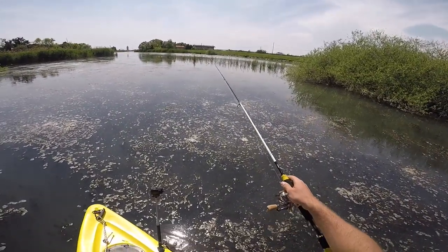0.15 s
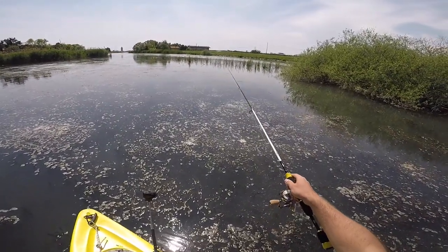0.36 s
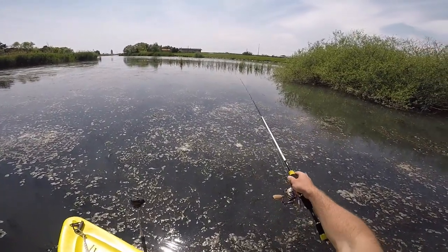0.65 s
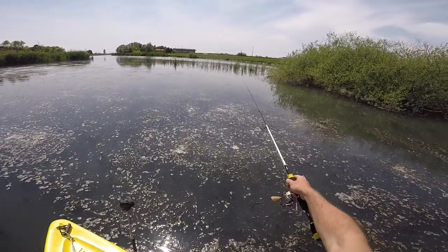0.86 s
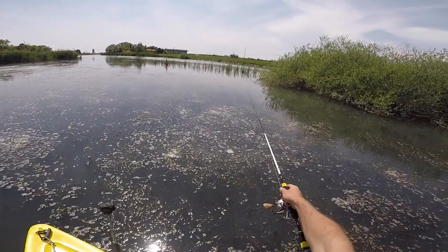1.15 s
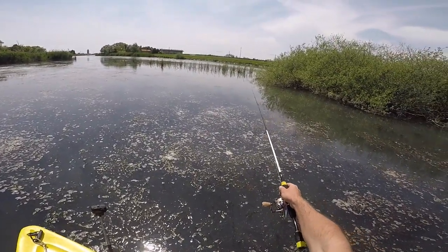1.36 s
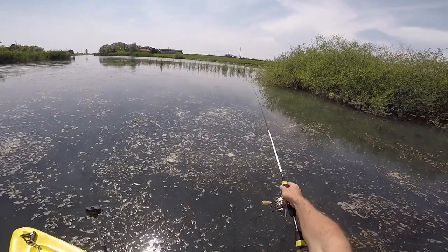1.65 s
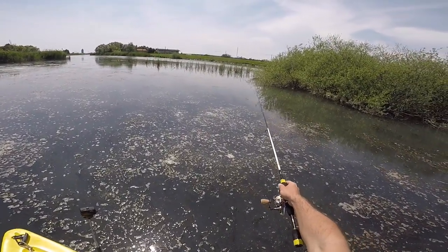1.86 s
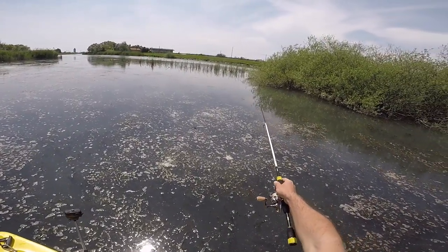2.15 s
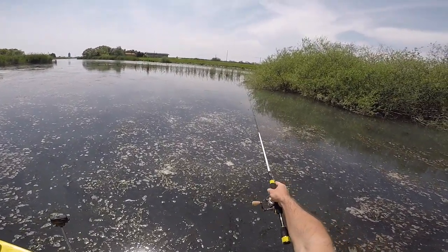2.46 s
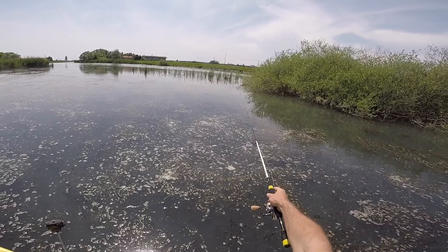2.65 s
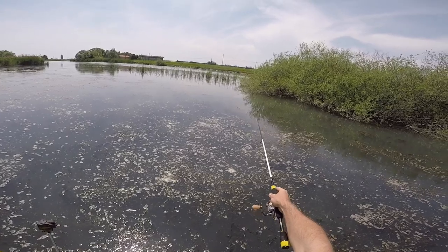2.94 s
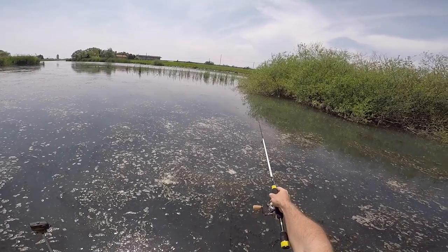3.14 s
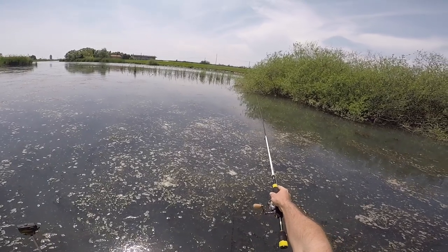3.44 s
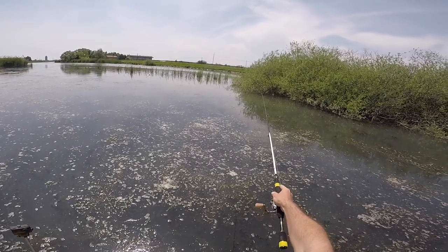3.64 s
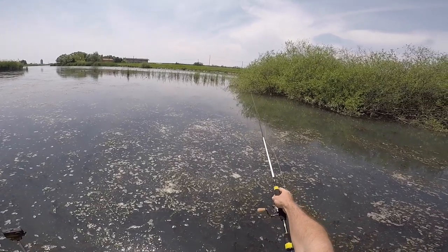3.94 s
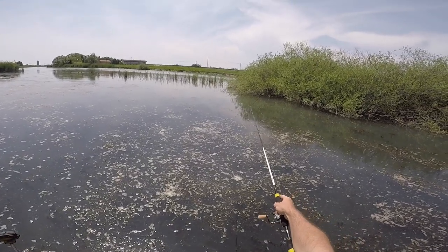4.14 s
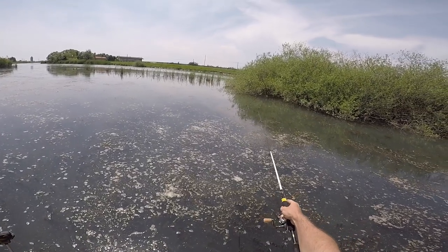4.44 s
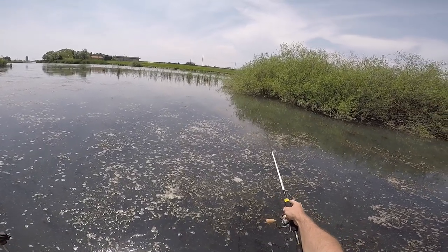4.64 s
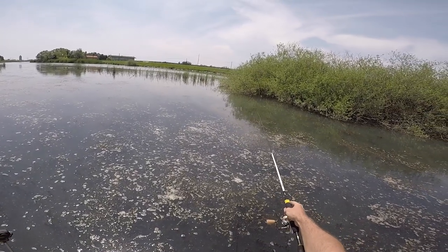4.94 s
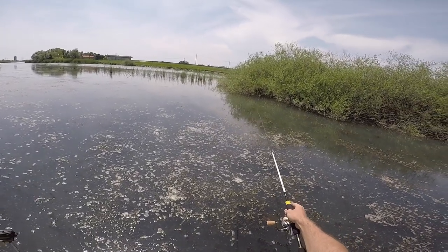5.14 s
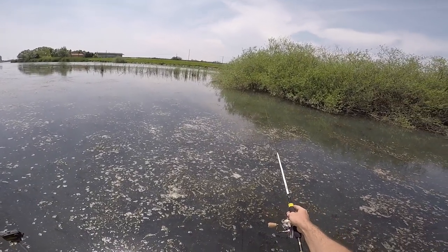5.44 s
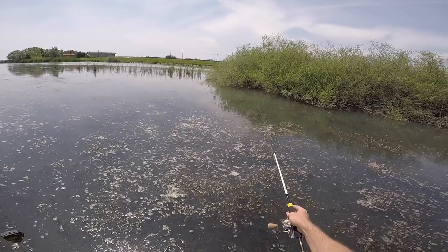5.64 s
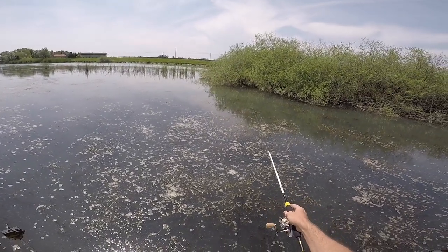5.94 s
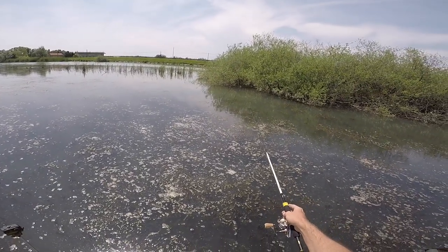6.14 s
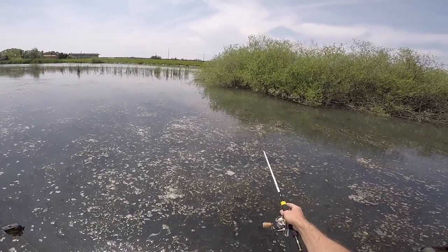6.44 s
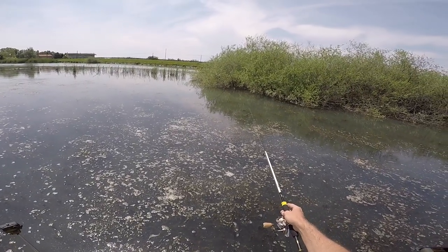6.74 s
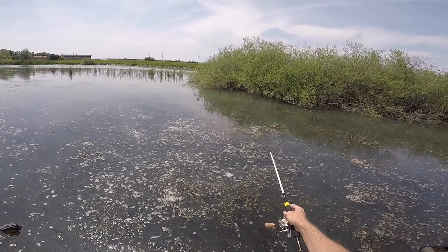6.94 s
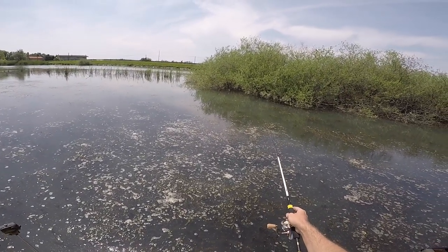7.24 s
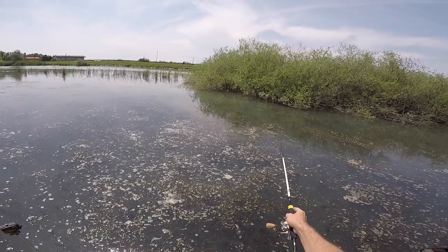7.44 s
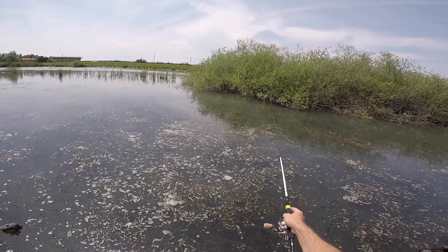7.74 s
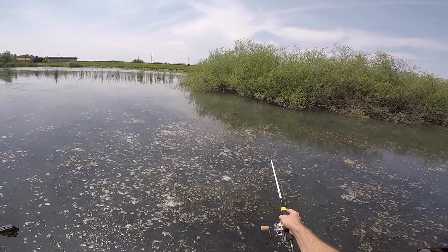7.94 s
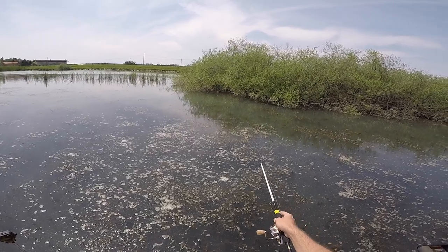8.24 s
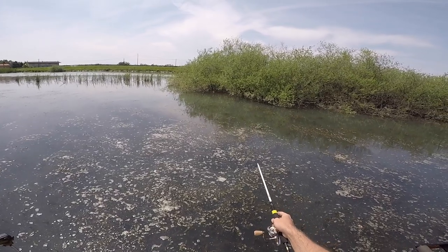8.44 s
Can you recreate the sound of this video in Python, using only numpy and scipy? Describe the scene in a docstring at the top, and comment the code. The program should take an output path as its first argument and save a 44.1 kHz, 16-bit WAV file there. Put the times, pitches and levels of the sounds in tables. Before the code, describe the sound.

Marsh birds whistle, twitter and trill over a distant road roar while fishing tackle ticks and squeaks close by and low wind rumbles on the microphone.

```python
"""An angler drifts on a marsh pond under a distant roar, a low drone, the rustle of reeds and far chatter.
Small birds whistle, twitter and buzz as swept sine tones; the tackle at the right ticks and squeaks throughout.
A far motor drones as one tone until about 2.4 s, just as wind starts to rumble as low noise on two microphone ports.
Dry trills of shaped noise, a peep and falling chips follow from 4.6 s, far tyres sing near 6 s at the left,
and arched chirps at the left end the scene while the wind, now head-on, sheds small eddies."""
import sys
import numpy as np
from scipy import signal
from scipy.io import wavfile
from scipy.ndimage import uniform_filter1d

SR = 44100
rng = np.random.default_rng(int(sys.argv[2]) if len(sys.argv) > 2 else 0)


def generate_wav(signal):
    """Clip the signal to [-1, 1] and save it as 16-bit WAV at the path in sys.argv[1]."""
    frames = np.transpose(np.atleast_2d(signal))
    scaled = np.clip(frames, -1, 1) * 32767
    pcm = np.round(scaled).astype(np.int16)
    wavfile.write(sys.argv[1], SR, pcm)


N = 378817
TIME = np.arange(N) / SR  # s
ALONG = np.linspace(0, 1, 64)  # progress through a note


def amp(db):
    """Decibel definition: 20 dB is a tenfold amplitude."""
    return 10 ** (np.asarray(db) / 20)


def unit(x):
    """Normalization: scales a signal to an rms of one."""
    return x / np.sqrt(np.mean(abs(x) ** 2) + 1e-24)


def follow(rows):
    """Linear interpolation: every column of a curve, at each sample."""
    s, *columns = np.transpose(rows)
    return [np.interp(TIME, s, column) for column in columns]


def shape(points, hz):
    """Spectral envelope: gain joined in dB on a log-frequency axis."""
    f, db = np.transpose(points)
    return amp(np.interp(np.log(hz + 1), np.log(f), db))


def place(x, pan_db):
    """Intensity panning: shares the power between the ports; a positive pan_db favours the left."""
    gains = np.array([amp(pan_db / 2), amp(-pan_db / 2)]).reshape(2, -1)
    return x * gains / np.sqrt(np.mean(gains ** 2, 0))


def add(mix, s, sound):
    """Superposition: adds a sound to the mix from s seconds on."""
    part = mix[:, max(round(s * SR), 0):][:, :sound.shape[-1]]
    part += sound[..., :part.shape[1]]


def drift(count, rate):
    """Slow random modulation: normal values, rate a second, joined by straight lines."""
    knots = rng.standard_normal(int(count / SR * rate) + 2)
    return np.interp(np.arange(count) / SR * rate, np.arange(len(knots)), knots)


def noise(points, same, lead_ms=0, patchy_db=0):
    """Partial coherence: coloured noise, alike at the ports by the share same, the left one leading."""
    hz = np.fft.rfftfreq(4096, 1 / SR)
    a, b, c, d, patches = rng.standard_normal((N // 1024 + 5, len(hz), 5)).T
    # level patches spread over neighbouring frequencies and moments
    patches = unit(uniform_filter1d(uniform_filter1d(patches, 40, 0), 5, 1))
    same = np.clip(same, 0, 1)
    left = a + 1j * b
    delay = np.exp(-2j * np.pi * hz * lead_ms / 10 ** 3)[:, None]
    right = same * left * delay + np.sqrt(1 - same ** 2) * (c + 1j * d)
    spectrum = np.array([left, right]) * shape(points, hz)[:, None] * amp(patchy_db * patches)
    return unit(signal.istft(spectrum, nperseg=4096, noverlap=3072)[1][:, :N])


def glide(hz, octaves, bow=0):
    """Logarithmic pitch: a slide centred on hz; bow makes it slide faster at first."""
    return hz * 2 ** (octaves * (ALONG - .5 - bow * (ALONG - .5) ** 2))


def whistle(length, pitches, overtone_db=-30, waver=0.015, flutter_db=2):
    """Near-pure tone: an unsteady pitch and its octave, a third of a cycle apart at the two ports."""
    u = np.linspace(0, 1, max(round(length * SR), 64))
    hz = np.interp(u, np.linspace(0, 1, len(pitches)), pitches) * (1 + waver * drift(len(u), 460))
    phase = 2 * np.pi * np.cumsum(hz) / SR + np.array([[0], [-2 * np.pi / 3]])
    swell = signal.windows.tukey(len(u), 1 / 4) * amp(flutter_db * drift(len(u), 185))
    return unit(swell * (np.sin(phase) + amp(overtone_db) * np.sin(2 * phase)))


def buzzy_note(length, pitch, octaves, sweep_hz, buzz_hz=185, rough=0.32):
    """Frequency modulation: a sliding note swept quickly up and down, its loudness pulsing at the same rate."""
    t = np.arange(round(length * SR)) / SR
    buzz = 2 * np.pi * buzz_hz * t
    sweep = sweep_hz * (np.sin(buzz) + rough * drift(len(t), 1684))
    hz = np.interp(t / length, ALONG, glide(pitch, octaves)) + sweep
    swell = signal.windows.tukey(len(t), .5) * (1 - 0.29 * np.cos(buzz))
    quarter_cycle = np.array([[0], [np.pi / 2]])  # between the ports
    return unit(swell * np.sin(2 * np.pi * np.cumsum(hz) / SR + quarter_cycle))


def banks(x, t60=0.31):
    """Diffuse reverberation: sparse scattered echoes after 4 ms, falling by 60 dB in t60 seconds."""
    t = np.arange(SR // 2) / SR
    sparse = rng.standard_normal((2, len(t))) * (rng.random((2, len(t))) < 2000 / SR)
    taps = sparse * amp(-60 * t / t60) * (t > .004)
    return signal.fftconvolve(x, taps / np.linalg.norm(taps, axis=1, keepdims=True), axes=1)[:, :N]


def skim(x, delay_s=.0055, echo=0.42):
    """Discrete reflection: a call arrives again off the water and the bank, its ports exchanged."""
    return x + echo * np.array([np.interp(TIME - delay_s, TIME, port) for port in x[::-1]])


# One bird's repeated falling chip. Each entry: start in seconds.
CHIP_STARTS = [4.999, 5.247, 5.563, 5.862, 6.216]
CHIP_S, CHIP_HZ, CHIP_OCTAVES, CHIP_SWEEP_HZ = 0.018, 6860, -0.245, 358
CHIP_DB, CHIP_FADE_DB_PER_S, CHIP_PAN_DB = -56.5, 5, 0  # level of the first chip, and its decline
FLICK_S, FLICK_HZ, FLICK_OCTAVES, FLICK_DB = .009, 5220, -.45, -7  # level relative to the chip


def chips():
    """Frequency modulation: falling buzzed chips, each weaker and ending in a soft downward flick."""
    out = np.zeros((2, N))
    for s in CHIP_STARTS:
        db = CHIP_DB - CHIP_FADE_DB_PER_S * (s - CHIP_STARTS[0])
        chip = buzzy_note(CHIP_S, CHIP_HZ, CHIP_OCTAVES, CHIP_SWEEP_HZ)
        add(out, s, amp(db) * place(chip, CHIP_PAN_DB))
        flick = whistle(FLICK_S, glide(FLICK_HZ, FLICK_OCTAVES))
        add(out, s + 0.98 * CHIP_S, amp(db + FLICK_DB) * place(flick, CHIP_PAN_DB))
    return out


# Buzzy calls. Each row: start in seconds, length in seconds, mid pitch in Hz, rise in octaves,
# level in dB, sweep in Hz, left over right in dB.
BUZZY_CALLS = [(1.415, 0.049, 6400, -.28, -59.5, 430, 8), (2.514, 0.032, 6100, -.12, -63.5, 330, 3),
               (3.205, 0.072, 5400, 0.24, -67, 330, 1), (3.747, 0.032, 7000, 0.3, -59.5, 700, 4),
               (4.14, .032, 4800, .42, -66, 220, -2), (4.195, 0.031, 5600, -1.2, -60, 150, 0),
               (4.29, 0.05, 3310, -0.081, -66.5, 480, 11)]


def buzzes():
    """Frequency modulation: single calls whose fast sweep is heard as a buzz."""
    out = np.zeros((2, N))
    for s, length, pitch, octaves, db, sweep_hz, pan_db in BUZZY_CALLS:
        add(out, s, amp(db) * place(buzzy_note(length, pitch, octaves, sweep_hz), pan_db))
    return out


# Dry trills. Each row: first syllable in seconds, end of the run in seconds, syllables per second,
# syllable length in seconds, mean level in dB before the cut in scene(), brightness from 0 to 1.
TRILL_RUNS = [(4.689, 4.93, 24, 0.038, -63, 0.1), (5.064, 5.21, 23.5, 0.013, -59, 1),
              (5.312, 6.43, 22.62, 0.014, -60, 0.93), (6.533, 6.56, 13, 0.032, -57.5, 1),
              (6.619, 7.11, 13, 0.039, -60, 0.8)]
# Spectra of the dull and the bright syllables. Each row: frequency in Hz, relative level in dB.
DULL_SPECTRUM = [(2500, -17), (3700, 7), (5100, -0.5), (6200, -20), (9000, -25)]
BRIGHT_SPECTRUM = [(3200, -6), (4600, -0.5), (5500, -5), (6400, 0.5), (7300, -4), (8500, -21)]


def warbler():
    """Amplitude-modulated noise: runs of short toneless syllables, from dull to bright."""
    dull, bright = np.zeros((2, 1, N))
    for first, last, rate, length, db, share in TRILL_RUNS:
        share = np.clip(share, 0, 1)
        for s in np.arange(first, last, 1 / rate):
            window = unit(signal.windows.tukey(round(length * SR), .8))
            syllable = amp(db + 1.8 * rng.standard_normal()) * window
            add(dull, s, np.sqrt(1 - share) * syllable)
            add(bright, s, np.sqrt(share) * syllable)
    return dull * noise(DULL_SPECTRUM, same=0.06) + bright * noise(BRIGHT_SPECTRUM, same=0.031)


# Arched chirps of one bird. Each row: start in seconds, length in seconds, top pitch in Hz, level in dB.
ARCHED_CHIRPS = [(0.562, 0.045, 4070, -69), (7.325, 0.022, 4480, -54.5), (7.569, 0.026, 4660, -58),
                 (7.825, 0.023, 4450, -57.5), (8.084, 0.038, 4540, -59.5), (8.396, 0.019, 4940, -55.5)]
ARCH_START_HZ, ARCH_END_HZ, ARCH_PAN_DB = 2710, 3180, 30


def arches(point=1.16, foot_db=-4):
    """Pitch arch: a tone that climbs and falls back, loudest at the top, at the left."""
    out = np.zeros((2, N))
    feet = ARCH_START_HZ + (ARCH_END_HZ - ARCH_START_HZ) * ALONG
    for s, length, top, db in ARCHED_CHIRPS:
        note = whistle(length, feet + (top - feet) * abs(np.sin(np.pi * ALONG)) ** point)
        swell = amp(foot_db * np.linspace(-1, 1, note.shape[1]) ** 2)
        add(out, s, amp(db) * place(unit(note * swell), ARCH_PAN_DB))
    return out


# Whistled slurs. Each row: start in seconds, length in seconds, pitch in Hz, rise in octaves,
# level in dB, left over right in dB.
WHISTLED_SLURS = [(.268, 0.033, 2930, -.12, -68, 8), (0.341, .065, 2770, 0.083, -65, 8),
                  (.582, 0.031, 6850, -.28, -64, 6), (1.098, 0.028, 2850, 0.42, -62, 12),
                  (2.868, 0.015, 3210, 0.37, -59, 15), (3.185, .016, 4230, 0.015, -64, 4),
                  (4.124, .012, 3450, -.45, -63, 4), (5.813, 0.04, 3700, -0.19, -66, 6),
                  (7.923, 0.036, 5630, -0.62, -65, -1)]
SLUR_ECHO_DB = -13  # these callers, like those of the buzzes and seeps, sit deeper in the bushes


def slurs(waver=0.0075, bow=0.54):
    """Portamento: plain tones that slide, with echoes from the bushes."""
    out = np.zeros((2, N))
    for s, length, hz, octaves, db, pan_db in WHISTLED_SLURS:
        note = whistle(length, glide(hz, octaves, bow), waver=waver)
        add(out, s, amp(db) * place(note, pan_db))
    return out + amp(SLUR_ECHO_DB) * banks(out)


# Thin dropping calls. Each row: start in seconds, length in seconds, top pitch in Hz, level in dB,
# left over right in dB, hold as a bare exponent (1 is an even slide, more is a later drop).
THIN_CALLS = [(1.949, 0.032, 7170, -54, 3, 5.8), (3.588, 0.047, 5330, -61.5, 0, 6.3)]
SEEP_DROP, SEEP_SCOOP = 0.48, 0.089  # shares of the pitch lost by the end and lacking at the start
SEEP_SCOOP_S = 0.0042  # time constant of the initial rise
SEEP_FADE_DB, SEEP_ECHO_DB, SEEP_T60 = -7, -9.5, .75  # loss by the end; echo level; ring of the bushes in s


def seeps():
    """Power-law glide: a thin tone holds a high pitch, then drops and fades, and the bushes ring."""
    out = np.zeros((2, N))
    for s, length, top, db, pan_db, hold in THIN_CALLS:
        scoop = SEEP_SCOOP * np.exp(-ALONG * length / SEEP_SCOOP_S)
        note = whistle(length, top * (1 - SEEP_DROP * ALONG ** hold - scoop), waver=0.0033)
        fade = amp(SEEP_FADE_DB * np.linspace(0, 1, note.shape[1]) ** (hold / 2))
        add(out, s, amp(db) * place(unit(note * fade), pan_db))
    return out + amp(SEEP_ECHO_DB) * banks(out, t60=SEEP_T60)


# A far bird's twitter. Each row: first syllable in seconds, end of the run in seconds,
# syllables per second, mean pitch in Hz, mean level in dB.
TWITTER_RUNS = [(0.663, .77, 26.5, 3290, -67.5), (0.829, 0.856, 31, 3460, -65),
                (1.214, 1.35, 23, 3430, -63), (3.027, 3.16, 25, 3460, -60.5)]


def twitterer(note_s=0.0135, fall_octaves=-0.088, grace_ratio=1.13, grace_db=-7, grace_lead_s=0.016,
              spread=0.011):
    """Rapid repetition: one syllable over and over, a soft high grace note before a falling note."""
    out = np.zeros((2, N))
    for first, last, rate, hz, db in TWITTER_RUNS:
        for s in np.arange(first, last, 1 / rate):
            hop, size = rng.standard_normal(2)
            pitches = glide(hz * (1 + spread * hop), fall_octaves)
            add(out, s - grace_lead_s, amp(db + size + grace_db) * whistle(note_s, grace_ratio * pitches))
            add(out, s, amp(db + size) * whistle(note_s, pitches))
    return place(out, 11)


# One round, dipping peep. Each row: time in seconds, pitch in Hz, level in dB.
PEEP_CURVE = [(4.571, 2890, -64), (4.582, 3220, -58), (4.591, 3040, -54), (4.601, 2940, -50.5),
              (4.613, 3100, -56), (4.626, 3150, -62)]
PEEP_PAN_DB, PEEP_ECHO_DB = 9, -6


def peep():
    """Pitch contour: one smooth note at the left, loudest where it dips, dying away in the reeds."""
    out = np.zeros((2, N))
    s, hz, db = np.transpose(PEEP_CURVE)
    length = s[-1] - s[0]
    note = whistle(length, np.interp(s[0] + ALONG * length, s, hz), waver=.006, flutter_db=-1.5)
    swell = amp(np.interp(s[0] + np.arange(note.shape[1]) / SR, s, db))
    add(out, s[0], place(note * swell, PEEP_PAN_DB))
    return out + amp(PEEP_ECHO_DB) * banks(out, t60=0.36)


# Ticks and creaks. Each row: start in seconds, length in seconds, level in dB, lift of the low modes in dB.
TICK_EVENTS = [(0.02, 0.0064, -52.5, -13), (0.141, 0.006, -53, 2), (0.955, 0.0019, -47.5, 8),
               (.966, 0.0025, -54, 0), (1.832, 0.0023, -51.5, -8), (2.169, 0.0042, -56, -9),
               (2.221, .007, -56.5, 4), (2.308, 0.0049, -49.5, -10), (2.442, 0.017, -55.5, -7),
               (2.511, 0.0027, -48.5, -6), (3.035, 0.0019, -51, -3), (3.249, .002, -55, -5),
               (4.038, 0.0017, -50.5, -4), (4.212, .012, -63, -4), (5.383, 0.0019, -55, -19),
               (6.410, 0.0024, -54.5, 6), (6.775, 0.003, -44.5, 9), (7.058, 0.0023, -56.5, -10),
               (7.1533, .009, -45, 9), (7.164, .003, -51, 0), (8.069, 0.001, -57, -15)]
# Modes of the reel. Each row: mean frequency in Hz, relative level in dB, 60 dB decay time in seconds.
REEL_MODES = [(1780, 4.5, 0.02), (2600, 4.5, 0.0058), (3660, 3.5, 0.0076), (4300, 4, 0.01),
              (5500, -8, 0.0044), (6300, 1, 0.0033), (7440, 0, 0.0099), (8150, -2, 0.005)]


def tackle(slips_per_s=1300, grit=0.55, crack_db=-4, crack_low_hz=1250, crack_high_hz=6800,
           dying_db=-9, first_slip=2.1, detune=0.03):
    """Stick-slip excitation of modes: a snap and a dying run of slips drive a dry crack and the reel."""
    out, t = np.zeros((2, N)), np.arange(1500) / SR
    band = signal.butter(6, [crack_low_hz, crack_high_hz], 'band', fs=SR, output='sos')
    crack = signal.sosfilt(band, signal.unit_impulse(len(t)))
    for s, length, db, body_db in TICK_EVENTS:
        count = round(length * SR)
        slips = (rng.random(count) < slips_per_s / SR) + grit / 2 * rng.standard_normal((2, count))
        slips[:, 0] += first_slip
        tuning = 1 + detune * rng.standard_normal(len(REEL_MODES))  # a little different each time
        ring = np.zeros(len(t))
        for k, (hz, level, t60) in enumerate(REEL_MODES):
            decay = amp(level + body_db * (hz < 4800) - 60 * t / t60)
            ring += (-1) ** k * decay * np.sin(2 * np.pi * hz * tuning[k] * t)
        response = unit(ring) + amp(crack_db) * unit(crack)
        dying_slips = slips * amp(dying_db * np.linspace(0, 1, count))
        tick = signal.fftconvolve(dying_slips, response[None], axes=1)
        add(out, s, amp(db) * tick * np.sqrt(count / np.sum(tick ** 2, 1, keepdims=True)))
    return place(out, -10.5)


# Rubbing squeaks. Each row: start in seconds, length in seconds, pitch in Hz, rise in octaves,
# level in dB, overtone relative to the fundamental in dB.
RUB_SQUEAKS = [(1.975, 0.027, 1660, -0.067, -55.5, -12), (2.056, 0.017, 3620, 0.14, -57, -6),
               (2.432, 0.022, 1758, 0.22, -52, -11), (6.459, 0.013, 1755, 0.22, -53, -7),
               (6.501, 0.017, 1800, -0.29, -55.5, -4), (6.809, 0.049, 3150, 0.2, -55.5, -12),
               (7.159, 0.027, 3020, 0.27, -52.5, -5), (7.498, 0.033, 2965, 0.25, -52, -9)]
SQUEAK_PAN_DB = -5.5


def squeaks(bow=0.91, grow_db=5):
    """Friction tone: rubbing parts of the reel sing, growing louder as the pitch levels off."""
    out = np.zeros((2, N))
    for s, length, hz, octaves, db, overtone_db in RUB_SQUEAKS:
        note = whistle(length, glide(hz, octaves, bow), overtone_db, waver=0.006)
        add(out, s, amp(db) * unit(note * amp(grow_db * np.linspace(0, 1, note.shape[1]))))
    return place(out, SQUEAK_PAN_DB)


# Strength of the wind on the ports. Each row: time in seconds, reference level in dB.
WIND_STRENGTH = [(0, -57), (1.3, -71), (2.15, -49.5), (2.3, -42), (2.75, -42.5), (3.5, -39), (5.3, -36),
                 (6.8, -45.5), (8.59, -41)]
# Single gusts. Each row: peak time in seconds, width at half amplitude in seconds, peak level in dB,
# left over right in dB, share of small eddies from 0 to 1.
SINGLE_GUSTS = [(2.42, 0.057, -34.5, -7, 0.02), (2.754, 0.059, -33, -11, 0), (3.42, 0.58, -39, -20, 0),
                (4.27, 0.31, -33.5, -10, 0.13), (5.573, 0.064, -35.5, -4, 0), (6.096, 0.071, -32, -4, 0),
                (6.34, 0.19, -40.5, 7, 0.4), (6.94, 0.32, -40.5, 10, 0.72), (7.28, 0.23, -37, -0.5, 1),
                (7.582, 0.31, -37.5, 4.5, 0.6), (7.852, 0.098, -32.5, -19, 1), (8.25, 0.47, -45, 2, .05)]
# Spectra of the large and the small eddies. Each row: frequency in Hz, relative level in dB.
LARGE_EDDIES = [(5, -12), (16, -0.5), (32, 1), (55, -1.5), (80, -13.5), (120, -23), (200, -58), (1500, -98)]
SMALL_EDDIES = [(15, -18), (50, -1.5), (90, 1), (150, -4), (220, -12.5), (350, -36), (800, -57),
                (2000, -87)]
# the boat drifts round, and the wind turns from side-on to head-on
TURN_START_S, TURN_END_S = 5.4, 6.2
SIDE_ON_PAN_DB, HEAD_ON_PAN_DB = -6, -4
RUMBLE_DB, SIDE_ON_EDDY_DB, HEAD_ON_EDDY_DB = 1.5, -12, -2.5  # relative to the wind
EDDY_PAN_DB = 5.5  # relative to the large eddies


def wind(lumpy_db=1.74):
    """Turbulent pressure: lumpy noise, mostly unrelated at the ports; head-on it sheds more small eddies."""
    db, = follow(WIND_STRENGTH)
    head_on = np.interp(TIME, [TURN_START_S, TURN_END_S], [0, 1])
    pan_db = SIDE_ON_PAN_DB + (HEAD_ON_PAN_DB - SIDE_ON_PAN_DB) * head_on
    eddy_db = SIDE_ON_EDDY_DB + (HEAD_ON_EDDY_DB - SIDE_ON_EDDY_DB) * head_on
    # powers, so that gusts add to the steady wind as unrelated noise
    large = place(amp(db + RUMBLE_DB), pan_db) ** 2
    small = place(amp(db + eddy_db), pan_db + EDDY_PAN_DB) ** 2
    for s, length, gust_db, side_db, share in SINGLE_GUSTS:
        power = place(amp(gust_db) * np.hanning(round(2 * length * SR)), side_db) ** 2
        share = np.clip(share, 0, 1)
        add(large, s - length, (1 - share) * power)
        add(small, s - length, share * power)
    out = np.zeros((2, N))
    for power, colour in [(large, LARGE_EDDIES), (small, SMALL_EDDIES)]:
        out += np.sqrt(power) * amp(lumpy_db * drift(N, 18)) * noise(colour, same=0.34)
    return out


# Pitch of the far motor. Each row: time in seconds, mean pitch in Hz.
MOTOR_CURVE = [(0.0, 205), (0.3, 202.5), (.75, 206), (1.13, 214), (1.32, 206), (1.5, 208), (1.85, 193.5),
               (2.03, 190.5), (2.27, 201), (2.5, 204.5)]
MOTOR_DB, MOTOR_SWELL_DB_PER_S, MOTOR_PEAK_S = -47.5, 4, 1.39
MOTOR_STOP_S, MOTOR_RELEASE_DB_PER_S = 2.42, 98


def motor():
    """Periodic source: one clean low tone swells slowly, sags and recovers in pitch, then dies away."""
    hz, = follow(MOTOR_CURVE)
    swell_db = -MOTOR_SWELL_DB_PER_S * np.maximum(MOTOR_PEAK_S - TIME, 0)
    release_db = -MOTOR_RELEASE_DB_PER_S * np.maximum(TIME - MOTOR_STOP_S, 0)
    waver_hz, flutter_db = .8 * drift(N, 20), .8 * drift(N, 9)
    phase = 2 * np.pi * np.cumsum(hz + waver_hz) / SR
    return place(amp(MOTOR_DB + swell_db + release_db + flutter_db) * unit(np.sin(phase)), -1.8)


# Swell of the reeds, which the chatter shares. Each row: time in seconds, level of the reeds in dB.
REED_LEVEL = [(0, -62.5), (1.3, -63.5), (1.8, -66), (2.5, -64.5), (3.6, -69), (6.3, -68.5), (7.3, -70.5),
              (8.59, -71.5)]
CHATTER_PER_S, CHATTER_S, CHATTER_OCTAVES = 16, 0.0182, 0.19  # the slide is at most this, up or down
CHATTER_LOW_HZ, CHATTER_HIGH_HZ, CHATTER_DB = 2650, 3893, -4.5  # level relative to the reeds


def chatter():
    """Reverberant field: many far birds' slurs at chance moments, heard only by way of their echoes."""
    out = np.zeros((2, N))
    swell_db, = follow(REED_LEVEL)
    for when, height, slide in rng.random((round(CHATTER_PER_S * N / SR), 3)):
        at = int(when * N)
        hz = CHATTER_LOW_HZ + (CHATTER_HIGH_HZ - CHATTER_LOW_HZ) * height
        note = whistle(CHATTER_S, glide(hz, CHATTER_OCTAVES * (2 * slide - 1)))
        add(out, at / SR, amp(swell_db[at] + CHATTER_DB) * note)
    return place(banks(out, t60=0.17), 3.7)


# Spectrum of the rustle. Each row: frequency in Hz, relative level in dB.
REED_SPECTRUM = [(700, -11.5), (1600, 0.5), (2300, -0.5), (3000, 1.5), (3700, -1.5), (4500, -8.5),
                 (6000, -28)]


def reeds():
    """Broadband noise: the rustle of the reeds, nearly alike at both ports."""
    return amp(follow(REED_LEVEL)[0]) * noise(REED_SPECTRUM, same=0.9, lead_ms=0.27, patchy_db=1.4)


# Spectrum of the far tyres. Each row: frequency in Hz, relative level in dB.
TYRE_SPECTRUM = [(800, -29), (1050, -8), (1200, 3.5), (1330, -6), (1600, -27), (3000, -47)]
# Swell of the tyres as they pass. Each row: time in seconds, level in dB.
TYRE_LEVEL = [(4.6, -82), (5.4, -65.5), (5.95, -56.5), (6.3, -66), (7.4, -66.5)]


def tyres():
    """Narrow-band noise: far tyres sing as they pass at the left."""
    return amp(follow(TYRE_LEVEL)[0]) * place(noise(TYRE_SPECTRUM, same=0.41, lead_ms=0.2), 12.0)


# Spectrum of the distant roar. Each row: frequency in Hz, relative level in dB.
ROAR_SPECTRUM = [(300, -12.5), (600, -9), (800, -4.5), (1050, 0.5), (1280, -4), (1500, -8.5), (1900, -14.5),
                 (2600, -21.5), (5000, -42.5)]
# Swell of the roar. Each row: time in seconds, level in dB before a lift of 2 dB.
ROAR_LEVEL = [(0, -53.5), (1.2, -54), (3.4, -55), (5.1, -55), (6.6, -55.5), (7.6, -57), (8.59, -57)]


def roar():
    """Broadband noise: a far road at the left, heard as a roar."""
    sound = noise(ROAR_SPECTRUM, same=0.51, lead_ms=0.39, patchy_db=1)
    return amp(follow(ROAR_LEVEL)[0] + 2.0) * place(sound, 3.6)


# Spectrum of the land's far low murmur. Each row: frequency in Hz, relative level in dB.
DRONE_SPECTRUM = [(60, -21), (115, -42), (150, -1), (190, -2.5), (230, 1.5), (280, -6), (340, -11.5),
                  (460, -12.5), (620, -20.5), (1000, -31), (2500, -77)]


def drone():
    """Low-frequency noise: the far murmur of the land, stronger at the right."""
    return amp(-47.5) * place(noise(DRONE_SPECTRUM, same=0.65, patchy_db=0.5), -6.5)


# Spectrum of the hiss with the microphone's peaks. Each row: frequency in Hz, relative level in dB.
HISS_SPECTRUM = [(500, 6.5), (3000, -4), (4800, -3.5), (5700, -0.5), (6500, 2.5), (7400, -0.5), (8300, -4),
                 (8580, 1.5), (8850, -3.5), (10200, -5), (11200, -10), (12800, -13.5), (14500, -36)]


def hiss():
    """Self-noise: hiss at a steady mean level, almost unrelated between the ports."""
    return amp(-62.5) * place(noise(HISS_SPECTRUM, same=0.022, patchy_db=1.4), -3.0)


BUZZ_ECHO_DB = -9


def scene():
    """Superposition: birds in the reeds, tackle close by, and the air around them."""
    buzzing = chips() + buzzes()
    buzzing = buzzing + amp(BUZZ_ECHO_DB) * banks(buzzing)
    whistling = arches() + slurs() + seeps() + twitterer()
    birds = skim(whistling + buzzing + amp(-6.5) * warbler())
    birds = birds + amp(-9.0) * banks(birds)
    gear = tackle() + squeaks()
    gear = gear + amp(-5.0) * banks(gear, t60=0.032)  # very short echoes from the boat
    air = drone() + roar() + tyres() + reeds() + hiss()
    return birds + peep() + chatter() + gear + motor() + wind() + air


EDGE_HZ = 14800


def record(dry):
    """Low-pass filtering: the recorder's band limit."""
    low_pass = signal.firwin(511, EDGE_HZ, window=("kaiser", 9), fs=SR)
    return signal.oaconvolve(dry, low_pass[None], "same")


dry = scene()
out = record(dry)
generate_wav(out)
```